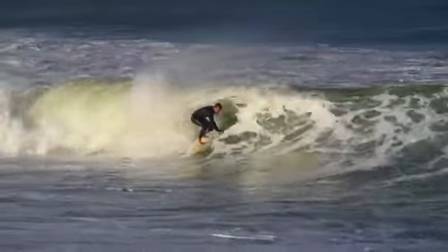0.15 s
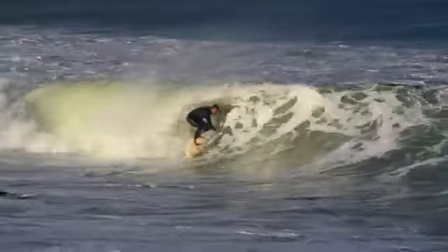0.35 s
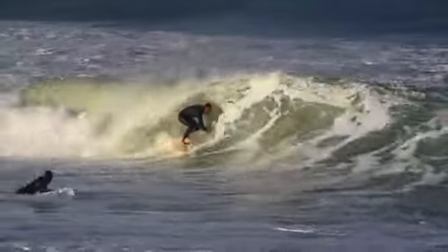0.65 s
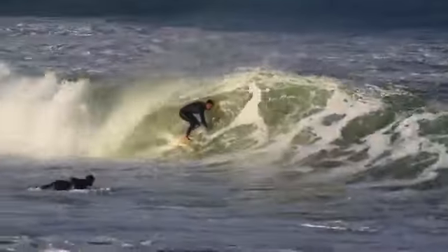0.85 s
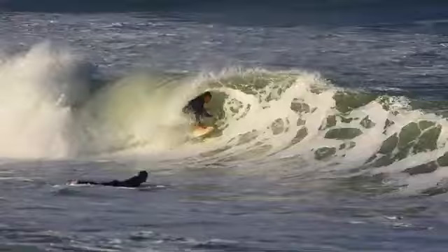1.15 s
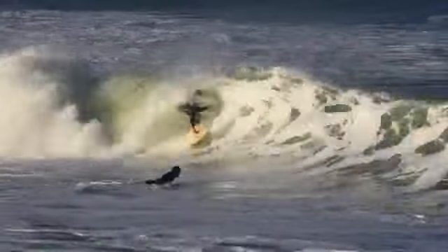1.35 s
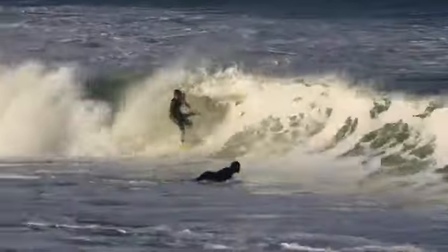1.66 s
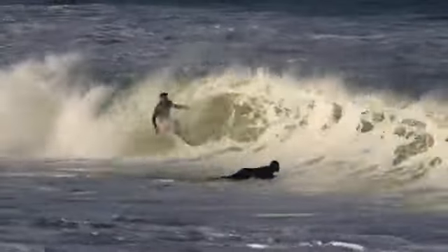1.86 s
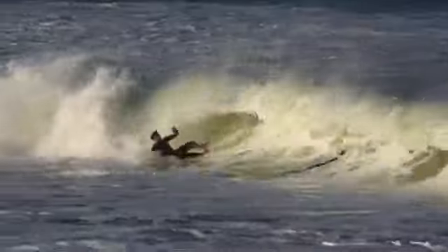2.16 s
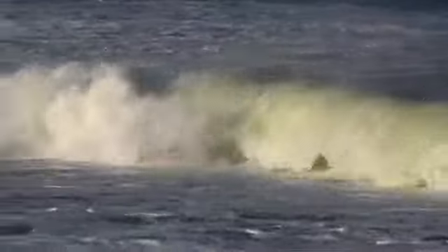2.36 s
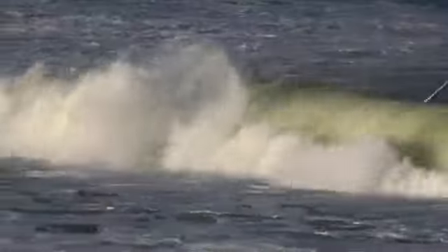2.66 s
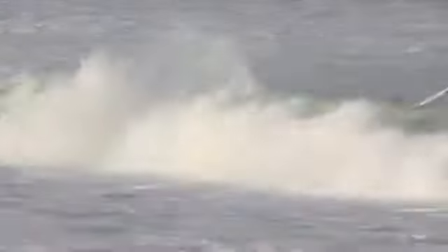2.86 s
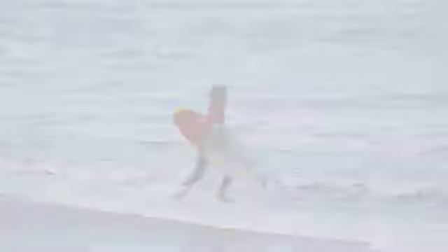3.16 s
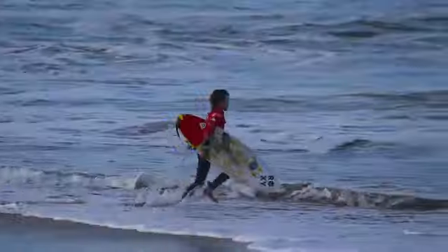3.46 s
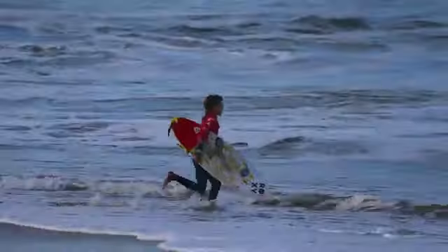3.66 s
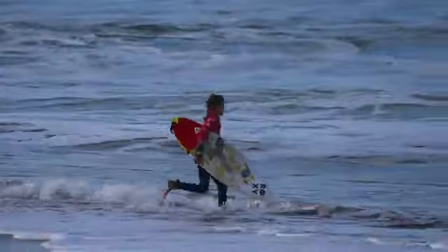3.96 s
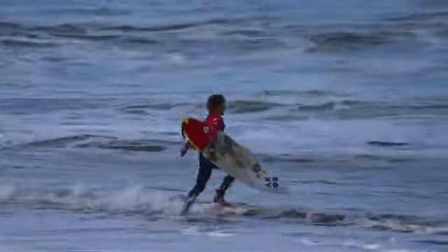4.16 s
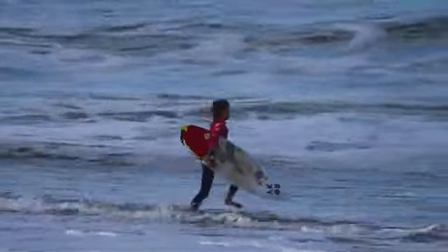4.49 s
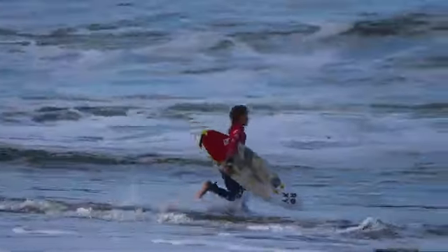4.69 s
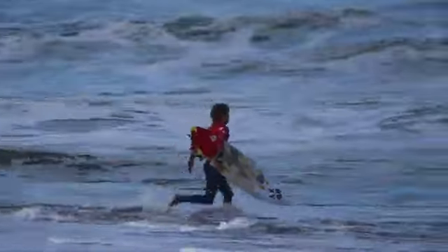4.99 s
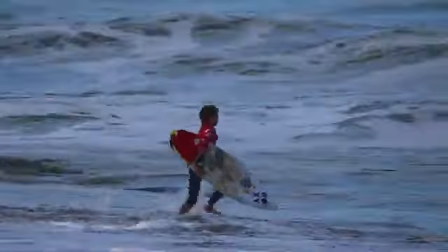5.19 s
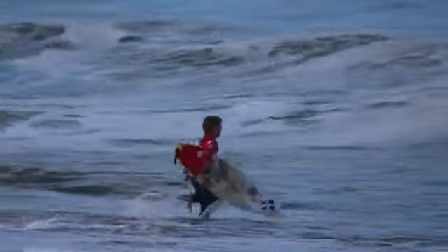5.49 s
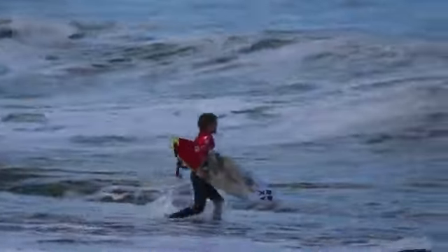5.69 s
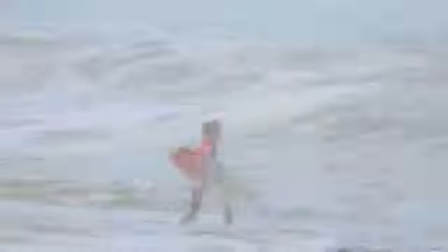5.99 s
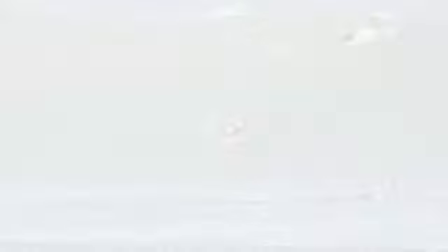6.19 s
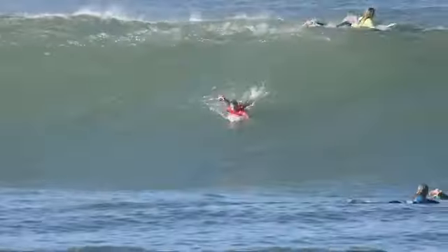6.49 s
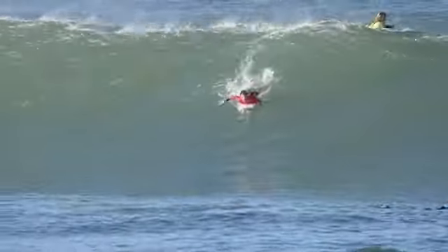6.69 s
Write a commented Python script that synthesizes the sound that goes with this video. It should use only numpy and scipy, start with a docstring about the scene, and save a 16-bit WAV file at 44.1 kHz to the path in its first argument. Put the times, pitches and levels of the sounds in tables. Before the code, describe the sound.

On a windy beach, an unshielded microphone picks up a continuous roar of waves, with foam hissing on top and a deep flutter of wind below. The surf swells, then breaks off for an instant with a tick. It resumes with a thump amid heavy, bassy gusts as another wash of white water grows. One more ticking cut comes shortly before the end, leaving gentler surf under the rumbling wind.

```python
"""A windy beach, heard in three stretches butted together; each join drops out briefly and ticks.
In the two long stretches a wave builds: breakers boom and roar far out, and white water washes and
fizzes up the sand, countless bursting bubbles blurred into six bands of noise. Gusts buffet the bare
microphone deep in the bass, and the second stretch opens mid-gust with a thud. A faint hiss lies below."""
import sys
import numpy as np
from scipy import signal
from scipy.fft import rfft, irfft
from scipy.io import wavfile
from scipy.ndimage import uniform_filter1d

SR = 44100
rng = np.random.default_rng(int(sys.argv[2]) if len(sys.argv) > 2 else 0)


def master_out(mix):
    """Clip the mix to full scale and print it as 16-bit PCM to the path in sys.argv[1]."""
    frames = np.transpose(np.atleast_2d(mix))
    ceiling = np.clip(frames, -1, 1)
    pcm = np.round(ceiling * 32767).astype(np.int16)
    wavfile.write(sys.argv[1], SR, pcm)


N = 301644

# Fader rides, one list per stretch
GUSTS = [
    [(0, -24.5), (0.55, -26), (0.92, -26.5), (1.45, -26.5), (1.92, -34.5), (2.23, -25.5), (2.9, -29.5),
     (3.129, -40)],
    [(3.13, -18.5), (3.29, -9), (3.57, -24), (3.78, -13.5), (4.25, -14.5), (4.68, -14), (4.85, -22),
     (5.1, -17), (5.3, -24), (5.48, -13), (5.85, -22.5), (6.215, -20.5)],
    [(6.226, -17.5), (6.84, -22.5)],
]  # slow wind buffeting: t/s, level/dB
FLUTTER_RIDE = [
    [(0, -44), (3.129, -37.5)],
    [(3.13, -32), (6.215, -34.5)],
    [(6.226, -35.5), (6.84, -27.5)],
]  # wind flutter before the gusts swing it: t/s, level/dB
WAVE_RISE = [
    [(0, 0, 0, 0), (0.4, 1.5, 0.5, -0.5), (0.65, 2, .5, 0), (0.94, 2.5, 1.5, 1.5), (1.25, 2, 2.5, 0.5),
     (1.5, 3.5, 3.5, 1), (1.85, 2.5, 2.5, 2.5), (2.19, 4.5, 3.5, 5), (2.5, 3.5, 5, 3.5), (2.85, 7, 6, 4.5),
     (3.129, 2.5, 1.5, 0.5)],
    [(3.13, 0, 0, 1), (3.5, -1.5, 1.3, 0), (4.2, 0, 4, 1), (4.68, .5, 5, 2.5), (4.98, 2, 7.5, 3),
     (5.29, 1, 6, 3.5), (5.7, 1, 7.5, 5.5), (6.05, 4, 7.5, 5), (6.215, 2, 6, 4)],
    [(6.226, -0.5, 1, 1), (6.84, 0, 0, -6)],
]  # the wave builds: t/s, roar rise/dB, white water rise/dB, treble rise/dB

# Tone curves: f/Hz, relative level/dB
HISS, HISS_DB = [(5000, -12), (9000, 2.5), (13000, -2), (16500, -2)], -85  # electronics, with rms level
BUFFET = [(1.5, -8.5), (3.5, -9), (8, 6.5), (14, -10.5), (22, -19), (30, -24.5), (45, -40)]  # subsonic shoves of air
FLUTTER = [(12, -30), (22, 4.5), (35, -2), (60, -12.5), (120, -35.5)]  # faster wind rumble
BOOM = [(30, -38), (65, -2.5), (110, -3.5), (170, -9.5), (260, -18.5)]  # weight of the breakers
ROAR = [(120, -36), (200, -4), (280, -0.5), (450, -1.5), (650, -7), (1100, -22)]  # body of the breakers
WASH = [(350, -13), (650, -4), (1000, -5.5), (1600, -10.5), (2200, -17), (3400, -35)]  # white water
FIZZ = [(1300, -9), (2200, -3.5), (3000, -6.5), (3900, -8), (4300, -12), (4700, -20.5), (6000, -51.5)]  # foam on the sand
SPRAY = [(3600, -38), (4700, -3.5), (6200, -2.5), (6800, -5), (8000, -22), (10000, -35)]  # bright top of the surf
MIST = [(5500, -24), (7500, -2.5), (8500, -6), (10000, -10), (12500, -17), (16500, -21.5)]  # airy top of the surf

# Surf mix, boom to mist: (base level/dB per stretch), (shares of the roar, white water and treble rise)
SURF_MIX = {"boom": ((-44.5, -46.5, -47), (0.12, 0, 0)), "roar": ((-45, -45, -46.5), (1, 0, 0)),
            "wash": ((-51, -47.5, -49.5), (0, 1, 0)), "fizz": ((-54.5, -56.5, -57), (0.2451, 0.0939, 0.62)),
            "spray": ((-67.7, -69.5, -69.5), (0, 0, 1)), "mist": ((-73.5, -77.5, -79.5),
            (-0.44, -0.14, 1.24))}
# Fizz and spray sit lower each time: frequency factor per stretch
TREBLE_SHIFT = 0.99, .97, 0.95
# Narrow microphone resonance: f/Hz, width/Hz, (lift/dB per stretch)
MIC_RING = 7020, 65, (8.7, 3.5, .6)
# Joins: end t/s, surf fade/s, wind fade/s, restart t/s, surf fade/s, wind fade/s, tick level/dB, tick t/s
JOINS = [(3.12907, .0001, .01, 3.1295, .0013, .02, -36, 3.12907),
         (6.2153, .002, .015, 6.2256, .0001, .02, -38, 6.2256)]


def from_db(db):
    """Decibels to gain."""
    return 10 ** (np.asarray(db) / 20)


def unit_rms(x):
    """Scale to rms 1."""
    return x / np.sqrt(np.mean(x ** 2) + 1e-20)


def stretch_index():
    """Which stretch plays at each sample."""
    starts = [rows[0][0] for rows in WAVE_RISE[1:]]
    return np.searchsorted(starts, np.arange(N) / SR)


def ride(table):
    """One fader curve per level column, running through all stretches."""
    times, *columns = np.transpose(np.concatenate(table))
    return [np.interp(np.arange(N) / SR, times, column) for column in columns]


def coloured(x, tone):
    """Equalise x with a tone curve; rms 1."""
    hz, level_db = np.transpose(tone)
    log_hz = np.log(np.arange(N // 2 + 1) * SR / N + 1e-3)
    shape_db = np.interp(log_hz, np.log(hz), level_db, left=-120, right=-120)
    return unit_rms(irfft(rfft(x) * from_db(shape_db), N))


def shifted(x, tone):
    """Equalise x with a tone curve that steps down from stretch to stretch."""
    versions = [coloured(x, np.multiply(tone, [factor, 1])) for factor in TREBLE_SHIFT]
    return np.choose(stretch_index(), versions)


def drift(rate_hz):
    """Smooth random wander of rms 1: low-passed noise at a coarse control rate."""
    hop, settle = 40, 2000
    pole = np.exp(-2 * np.pi * hop * rate_hz / SR)
    noise = rng.standard_normal(N // hop + settle + 2)
    slow = signal.lfilter([1], [1, -2 * pole, pole * pole], noise)[settle:]
    return np.interp(np.arange(N) / hop, np.arange(len(slow)), unit_rms(slow))


def evened(x, window_s, share):
    """Compress away a share of the noise's own swells, so the fader sets the level."""
    power = uniform_filter1d(x ** 2, int(window_s * SR)) + .02
    return unit_rms(x / power ** (share / 2))


def hiss():
    """Faint, steady noise floor of the electronics."""
    return from_db(HISS_DB) * coloured(rng.standard_normal(N), HISS)


def mic_ring(x):
    """A resonance lifts one narrow treble band, most in the first stretch."""
    hz, width_hz, lift_db = MIC_RING
    b, a = signal.iirpeak(hz, hz / width_hz, SR)
    return x + (from_db(lift_db)[stretch_index()] - 1) * signal.lfilter(b, a, x)


def joined(water, rumble):
    """Mix surf and wind; at each join both drop out for an instant and a small step ticks."""
    t, ticks = np.arange(N) / SR, 0
    tick_decay_s = .0018
    for end, water_out, rumble_out, start, water_in, rumble_in, tick_db, tick_at in JOINS:
        water = water * np.clip(np.maximum((end - t) / water_out, (t - start) / water_in), 0, 1)
        rumble = rumble * np.clip(np.maximum((end - t) / rumble_out, (t - start) / rumble_in), 0, 1)
        since = (t - tick_at) * (-1 if tick_at < start else 1)  # a closing tick plays in reverse
        ticks = ticks - from_db(tick_db) * (since >= 0) * np.exp(-np.abs(since) / tick_decay_s)
    return water + rumble + ticks


def gust_thud(at_s, rise_s, decay_s, level_db):
    """A quick push of air on the diaphragm, which relaxes more slowly."""
    since = np.maximum(np.arange(N) / SR - at_s, 0)
    push = np.sin(np.pi / 2 * np.minimum(since / rise_s, 1)) ** 2
    return -from_db(level_db) * push * np.exp(-since / decay_s)


def wind():
    """Eddies shove the diaphragm in slow lumps; a faster flutter on top partly follows the gusts."""
    buffet = evened(coloured(rng.standard_normal(N), BUFFET), window_s=.2, share=.6)
    flutter = evened(coloured(rng.standard_normal(N), FLUTTER), window_s=.12, share=.3)
    gust_db, stretch = ride(GUSTS)[0], stretch_index()
    mean_db = np.bincount(stretch, gust_db) / np.bincount(stretch)
    flutter_db = ride(FLUTTER_RIDE)[0] + .37 * (gust_db - mean_db[stretch])
    return from_db(gust_db) * buffet + from_db(flutter_db) * flutter


def bubbles(per_s, spread_db):
    """Bubbles burst at random instants: clicks of uneven size and either polarity."""
    sizes = from_db(spread_db * np.minimum(rng.exponential(1, N), 5))
    polarity = rng.choice([-1, 1], N)
    return sizes * polarity * (rng.random(N) < per_s / SR)


def surf():
    """Bursts blur into bands that ride the wave; splashes swell the upper ones a little, together."""
    splash, churn = drift(rate_hz=4.3), drift(rate_hz=40)
    # tone, bursts per second, splash depth/dB, churn depth/dB, own flicker/dB
    bands = [(BOOM, 3000, .05, .05, .6), (ROAR, 8000, .1, .1, .4), (WASH, 15000, .2, .3, .3),
             (FIZZ, 25000, .25, .4, .25), (SPRAY, 30000, .3, .55, .25), (MIST, 30000, .35, .7, .25)]
    rises_db = np.array(ride(WAVE_RISE))
    water, stretch = np.zeros(N), stretch_index()
    for (base_db, shares), band in zip(SURF_MIX.values(), bands):
        tone, per_s, splash_db, churn_db, flicker_db = band
        level_db = np.take(base_db, stretch) + np.dot(shares, rises_db)
        swell_db = splash_db * splash + churn_db * churn + flicker_db * drift(rate_hz=4.8)
        equalise = shifted if tone in (FIZZ, SPRAY) else coloured
        water += from_db(level_db + swell_db) * equalise(bubbles(per_s, spread_db=1.5), tone)
    return water


def scene():
    """Surf and wind on one microphone, over the hiss."""
    water = hiss() + mic_ring(surf())
    beach = joined(water, wind())
    thud = gust_thud(at_s=3.1295, rise_s=.0012, decay_s=.008, level_db=-19)
    return (beach + thud)[None]


def record(dry):
    """A steep high cut at 15.7 kHz."""
    return signal.sosfilt(signal.ellip(12, .2, 80, 15700, fs=SR, output="sos"), dry)


dry = scene()
out = record(dry)
master_out(out)
```